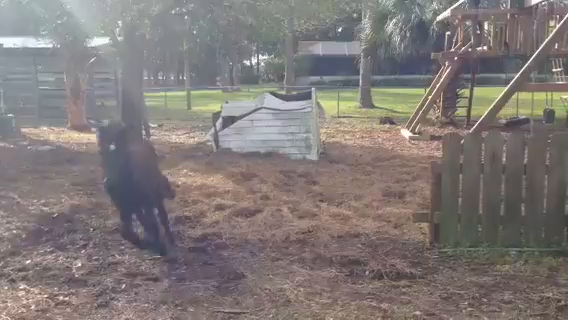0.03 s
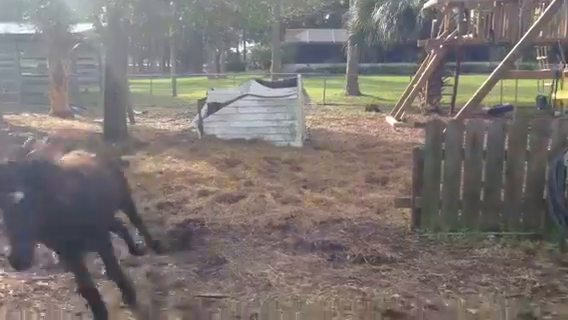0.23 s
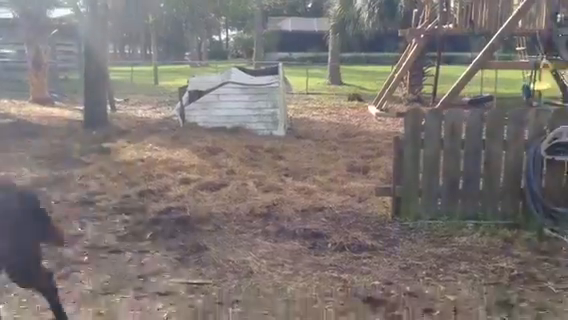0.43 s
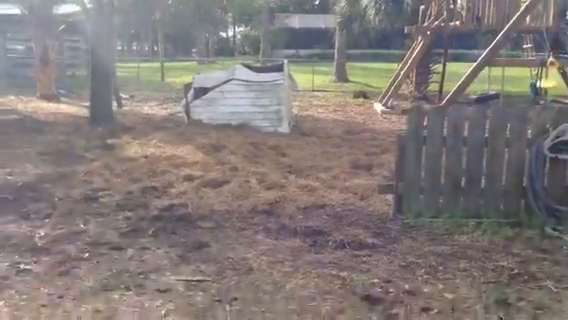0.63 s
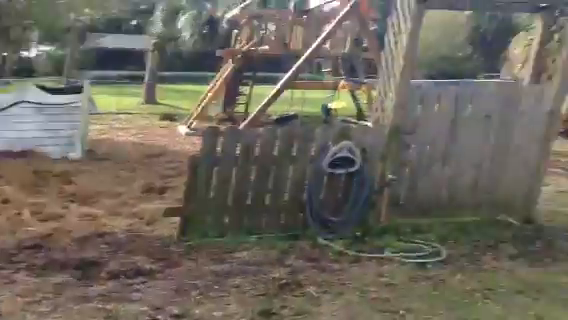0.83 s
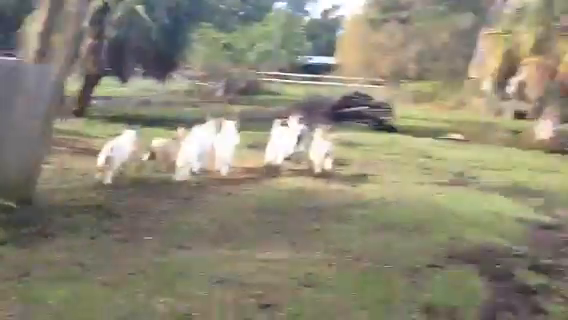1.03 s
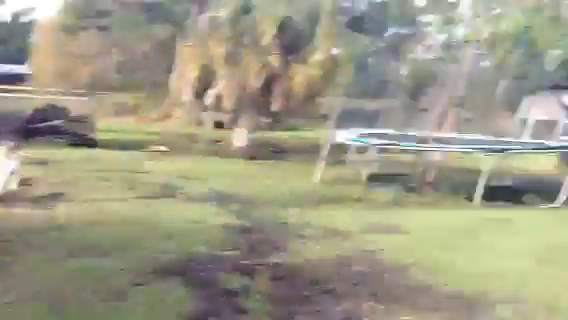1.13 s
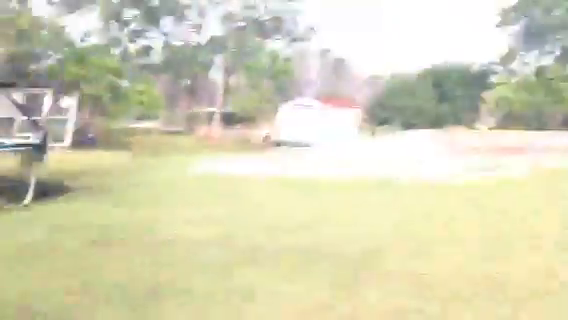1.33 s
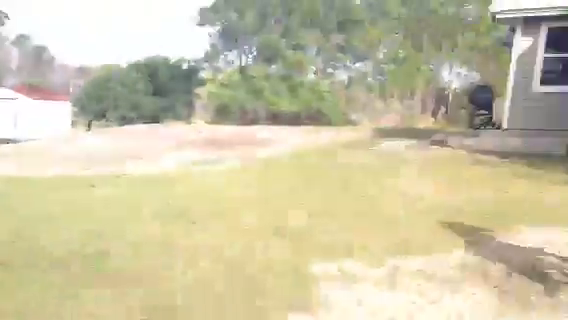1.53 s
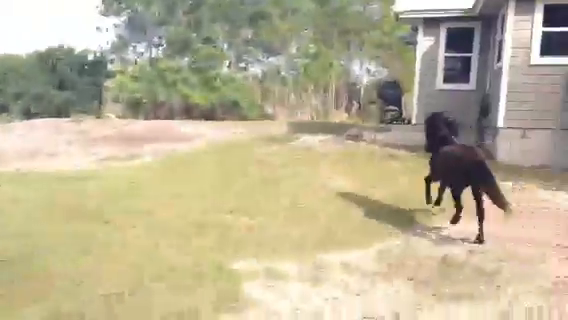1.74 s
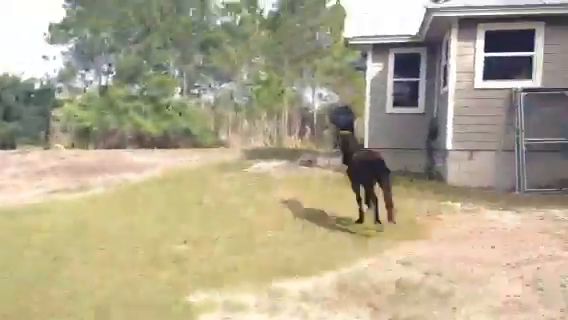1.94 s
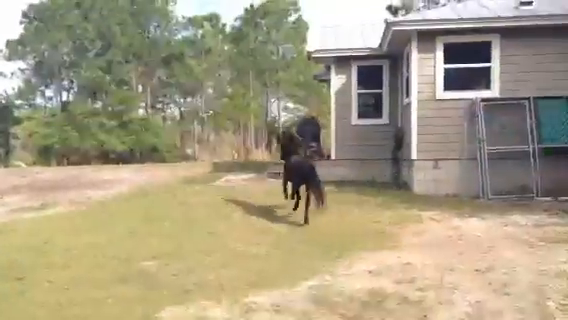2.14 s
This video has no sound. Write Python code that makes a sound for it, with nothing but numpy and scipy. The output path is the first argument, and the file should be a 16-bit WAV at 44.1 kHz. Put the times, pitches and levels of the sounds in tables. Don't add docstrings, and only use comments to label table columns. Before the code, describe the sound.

Quick galloping hoof thuds with gritty crunches on soft ground, over faint yard hum and hiss

```python
import sys
import numpy as np
from scipy import signal
from scipy.fft import rfft, irfft
from scipy.io import wavfile
from scipy.ndimage import uniform_filter1d

SR = 44100
rng = np.random.default_rng(int(sys.argv[2]) if len(sys.argv) > 2 else 0)


def transcribe(signal):
    frames = np.atleast_2d(signal).T
    limited = np.clip(frames, -1, 1)
    pcm = np.round(limited * 32767).astype(np.int16)
    wavfile.write(sys.argv[1], SR, pcm)


def magnitude_from_level(level_db):
    exponent = np.asarray(level_db, float) / 20
    return 10 ** exponent


N = 97020

# (frequency [Hz], density [dB per Hz])
YARD_SPECTRUM = [(15, -5), (25, -21.5), (93, 1.5), (136, -4), (399, -12.5), (482, -23.5), (1530, -24.5),
                 (2920, -29.5), (15500, -36)]
# (time [s], level [dB])
SWING_LEVEL = [(.09, -65), (.5, -60), (.9, -60), (1.05, -53.5), (1.25, -57.5), (1.4, -75), (2.2, -67)]
# (time [s], level [dB])
RUSTLE_LEVEL = [(.09, -57), (.2, -58), (.35, -58), (.55, -58), (.65, -57), (.8, -55), (1.0, -55),
                (1.3, -60), (2.2, -66)]
# (frequency [Hz], density [dB per Hz])
LITTER_SPECTRUM = [(120, 15.5), (270, 6.5), (410, 6.5), (600, 4), (1500, -1), (2450, -12), (2800, -26)]
# (time [s], level [dB])
DIRT_LEVEL = [(.09, -67), (.2, -59), (.26, -58), (.34, -60.5), (.42, -62), (.5, -63.5), (.56, -62.5),
              (.63, -64), (.78, -63.5), (.9, -73), (1.05, -67), (1.2, -74.5), (1.6, -72.5), (2.2, -85)]
# (frequency [Hz], density [dB per Hz])
DIRT_SPECTRUM = [(300, -11), (800, 5.5), (1500, 3), (2600, -3), (5000, -5), (9000, -7.5), (15000, -16)]
# (time [s], level [dB], length [ms], centre [Hz])
SCUFFS = [(.1445, -49.5, 1.7, 3040), (.198, -56.5, 16, 1720), (.196, -61, 4.7, 6500),
          (.547, -63, 4.4, 8500), (.4345, -58, 1.1, 6500), (.235, -65, 5.6, 4000), (.2595, -58, 2.4, 2000),
          (.4835, -51, 3.9, 2770), (.505, -62.5, 10, 3170), (.523, -55.5, 7.2, 1690),
          (.5395, -57.5, 8.2, 2060), (.55, -62, 14, 3280), (.5665, -55.5, 7.3, 1790), (.5945, -51, 2, 4540),
          (.608, -66, 4, 4530), (.680, -50.5, 4.3, 1760), (.7525, -52, 5.3, 2660), (.8135, -56.5, 3, 2200),
          (.8385, -63, 5, 2130), (.93, -70, 3, 1840), (.958, -54, 8.1, 2200), (1.122, -67, 3, 1950),
          (1.3805, -56, 4.2, 710), (1.4793, -53.5, 2.3, 2110), (1.479, -55, 2.5, 8260),
          (1.557, -60, 1.5, 1930), (1.657, -68, 6, 3480), (1.682, -70, 3, 4300), (1.787, -64.5, 11, 1620),
          (1.806, -61.5, 2.5, 3750), (1.865, -67, 4, 1700), (1.893, -61, 4.6, 3600),
          (1.906, -57, 3.9, 1850), (1.913, -69, 2.4, 3500), (1.993, -64.5, 4.2, 2600),
          (2.142, -62.5, 6, 1070)]
# (time [s], level [dB], length [ms], centre [Hz])
CRUNCHES = [(0.1466, -50.5, 3.5, 6500), (0.1862, -50, 0.91, 6328.0), (0.1916, -55, 6.9, 4015.0),
            (0.2615, -55, 3.8, 5560), (0.2737, -60.5, 9, 5711.0), (0.4343, -65, 1.1, 5907.0),
            (0.4848, -54.5, 2.5, 4120), (0.4909, -50, 1.3, 4920), (0.5483, -77, 2.2, 4887.0),
            (0.5945, -58, 2.3, 5000), (0.6805, -52, 6, 5760), (0.7515, -58, 5.9, 4170),
            (0.7758, -57, 1.1, 5759.0), (0.8387, -62, 11, 4575.0), (0.9635, -77, 3, 3468.0),
            (1.3811, -64.5, 6.4, 5400), (1.453, -64, 4, 5448.0), (1.4791, -55.5, 3.5, 4700),
            (1.5425, -56, 2.5, 4280), (1.5592, -59.5, 6.9, 3280), (1.8062, -72, 2.4, 4500),
            (1.8929, -67, 1.5, 4540), (1.9061, -62.5, 4, 6260),
            (.3217, -58, 1.8, 5000),
    (.3314, -54, 2.2, 9000),
    (.9656, -52, 4, 2100),
    (1.0172, -56, 3.3, 2200),
]
RINGING_THINGS = {"stick": (1090, -28.5, 5.9), "stick high": (2140, -35.5, 7.4),
                  "stone": (4850, -32.5, 7.5), "stone low": (3600, -45, 7.6),
                  "hoof crack": (2160, -30.5, 13.3), "hoof wall": (767, -29.5, 37),
                  "hoof edge": (1460, -21.5, 4.2), "grit": (4510, -42, 11), "clod": (2350, -50, 30),
                  "sole": (376, -31.5, 42), "toe": (930, -37.5, 9.1), "heel": (700, -46, 16),
                  "toe on grass": (970, -43, 11), "chip": (4900, -49.5, 10), "shell": (1700, -50.5, 17)}
RINGING_TIMES = [.1913, .1914, .3306, .3310, .9618, .9622, .9632, .9645, 1.054, .9627, .1468, 1.3798,
                 1.4785, 1.5412, 1.8635]
# (time [s], peak [dB], pressure ramp [ms])
SLAPS = [
    (0.1922, -40, 0.25),
    (0.7527, -36.5, 1.2),
    (0.9636, -24, 1.08),
]
# (time [s], level [dB], length [ms], centre [Hz])
KNOCKS = [(0.148, -50, 1.15, 940), (0.1925, -53, 2.3, 1280), (0.4855, -57.5, 5.4, 1460),
          (0.5479, -53, 6.9, 1390), (0.7527, -48, 3.1, 1310), (0.842, -54.5, 7.9, 1490),
          (1.0216, -52, 5.9, 920), (1.3816, -58, 11, 750), (1.454, -55, 7.4, 900), (1.4795, -55.5, 3, 1020),
          (1.559, -51.5, 1.4, 885), (1.8059, -55.5, 3, 830), (1.8937, -64, 1.5, 1195.0),
          (1.8975, -56, 3.6, 890), (1.9057, -68, 3.5, 1300)]
# (time of first crest [s], peak [dB], pitch [Hz], ring [cycles])
HOOF_THUDS = [(0.1468, -38.5, 150.0, 2.5), (0.156, -36, 150.0, 3.6), (0.2066, -39, 143.0, 1.3),
              (0.2608, -35, 217, 3.4), (0.2761, -31.5, 175, 1.5), (0.3066, -48, 150, 1.2),
              (0.3229, -29.5, 200, 1.27), (0.339, -38.5, 217, 2.4), (0.3598, -41.5, 153.0, 3),
              (0.4703, -46, 157, 1), (0.4836, -35.5, 155, 3.6), (0.4993, -41.5, 159, 1.3),
              (0.5178, -45, 150.0, 1.7), (0.536, -46, 180, 1.3), (0.5422, -39, 200, 2.2),
              (0.592, -41, 152.0, 0.9), (0.6812, -29, 155, 2.2), (0.6848, -30, 413, 1.26),
              (0.7056, -63, 126, 2.4), (0.7168, -39, 135, 1.3), (0.7533, -30.5, 180, 1.4),
              (0.7806, -37.5, 156, 0.74), (0.8229, -37, 222, 0.47),
              (0.9576, -33, 170, 1.1), (0.9628, -25, 175, 1.2), (0.9796, -33, 166, 0.98),
               (1.0199, -34, 132, 4.3), (1.0775, -34.5, 150.0, 2), (1.085, -34, 144, 0.17),
               (1.1494, -41.5, 172, 1.5), (1.1606, -40, 143, 5.1), (1.3797, -34, 199, 3.3),
               (1.3943, -37, 168, 3.1), (1.452, -39.5, 233, 1.4), (1.4787, -31, 203, 2.3),
               (1.558, -34, 242, 0.74), (1.8027, -39, 290, 0.9), (1.8056, -28.5, 294, 1.27),
               (1.8508, -46, 240.0, 2.2), (1.888, -40.5, 357, 9.9), (1.9035, -30.5, 140, 0.78),
               (1.9446, -43.5, 233, 1.2), (1.9934, -36, 260, 1.3)]


def noise():
    return rng.standard_normal(N)


def unit(x):
    return x / np.sqrt(np.mean(x ** 2))


def resonance(x, hz, width_hz):
    return signal.lfilter(*signal.iirpeak(hz, hz / width_hz, fs=SR), x)


def double_resonance(x, hz, width_hz):
    return resonance(resonance(x, hz, width_hz), hz, width_hz)


def colour(x, spectrum):
    hz, db = np.array(spectrum).T
    bins_hz = np.maximum(np.arange(N // 2 + 1) * SR / N, 1)
    gain = magnitude_from_level(np.interp(np.log(bins_hz), np.log(hz), db, left=-60))
    return unit(irfft(rfft(x) * gain, N))


def curve(points):
    return np.interp(np.arange(N) / SR, *np.array(points).T)


def walk(rate_hz):
    k = int(SR / rate_hz)
    held = np.repeat(rng.standard_normal(N // k + 1), k)
    return 1.3 * uniform_filter1d(uniform_filter1d(held, k), k)[:N]


def decay(t, t60_s):
    return np.exp(-np.log(1000) * t / t60_s)


def add(out, x, at_s):
    i = int(at_s * SR) - len(x) // 2
    out[i:i + len(x)] += x[:len(out) - i]


def yard():
    air = colour(noise(), YARD_SPECTRUM)
    bass = signal.sosfilt(signal.butter(2, 500, fs=SR, output="sos"), air)
    hiss = air - bass
    air = bass * magnitude_from_level(1.0 * walk(18)) + hiss
    hum_hz = 90 * (1 + .05 * walk(15))
    hum = np.sin(2 * np.pi * np.cumsum(hum_hz) / SR) * magnitude_from_level(4.5 * walk(10.88))
    return magnitude_from_level(-57) * air + magnitude_from_level(-63) * hum


def swing():
    air = noise()
    buffeting = unit(double_resonance(air, 65, 48))
    sway = unit(double_resonance(air, 41.4, 41))
    return (buffeting + magnitude_from_level(-12) * sway) * magnitude_from_level(curve(SWING_LEVEL) + 2.5 * walk(11.7))


def rustle():
    return colour(noise(), LITTER_SPECTRUM) * magnitude_from_level(curve(RUSTLE_LEVEL) + 1.0 * walk(40.26))


def falling_dirt():
    GRAINS_PER_S, GRAIN_SPREAD_DB = 6000, 2.0
    lands = rng.random(N) < GRAINS_PER_S / SR
    weight = magnitude_from_level(GRAIN_SPREAD_DB * np.minimum(rng.exponential(size=N), 4))
    hits = lands * weight * noise()
    return colour(hits, DIRT_SPECTRUM) * magnitude_from_level(curve(DIRT_LEVEL) + 1.3 * walk(25))


def bursts(rows, q, spread_db):
    SHARP_ATTACK, TAIL_LENGTHS, TAIL_DB = .4, 16, -15.5
    t, out = np.arange(-1024, 1024) / SR, np.zeros(N)
    for s, db, ms, hz in rows:
        grains = rng.standard_normal(2048) * magnitude_from_level(spread_db * rng.standard_normal(2048))
        width = ms / 1500
        from_peak = t + .5 * width
        side_width = width * np.where(from_peak < 0, SHARP_ATTACK, 1)
        core = np.exp(-.5 * (from_peak / side_width) ** 2)
        x = double_resonance(grains, hz, 1.5 * hz / q)
        x = x / np.sqrt(np.sum((x * core) ** 2) / np.sum(core ** 2))
        tail = (t > 0) * np.exp(-np.abs(t) / (TAIL_LENGTHS * width))
        add(out, magnitude_from_level(db) * x * (core + magnitude_from_level(TAIL_DB) * tail), s)
    return out


def struck_things():
    t, out = np.arange(-2048, 2048) / SR, np.zeros(N)
    after = np.maximum(t, 0)
    for s, (hz, db, t60_ms) in zip(RINGING_TIMES, RINGING_THINGS.values()):
        onset = 1 - np.exp(-after / 0.00024)
        ring = np.sin(2 * np.pi * hz * after) * decay(after, t60_ms / 1000)
        add(out, magnitude_from_level(db) * onset * ring, s)
    return out


def slaps():
    t, out = np.arange(-2048, 2048) / SR, np.zeros(N)
    held = 1 / (1 + np.exp(np.clip(t / .00007, -50, 50)))
    for s, db, ms in SLAPS:
        ramps = t / (ms / 1000)
        push = np.clip(1 + ramps, 0, 1) ** 1.2 * held
        recoil = 0.73 * (1 - held) * np.exp(-(np.abs(ramps) / 4.4) ** 3)
        add(out, magnitude_from_level(db) * (push - recoil), s)
    return out


def thuds(rows):
    RISE_SHARE, CREST_CYCLES, SAG, OVERTONE_DB = .75, .33, 0.1, -23
    ROLL_DB, ROLL_HZ, ROLL_WIDTH_HZ, ROLL_T60_S = -13, 150, 180, 0.13
    t, hit, push = np.arange(-4096, 4096) / SR, np.zeros(N), np.zeros(N)
    after = np.maximum(t, 0)
    roll = (1 - np.exp(-(after / 0.0071) ** 2)) * decay(after, ROLL_T60_S)
    for s, db, hz, ring in rows:
        cycles = t * hz
        late = np.maximum(cycles - CREST_CYCLES, 0)
        rise = RISE_SHARE * min(ring, 1.2)
        width = 0.34 * np.where(cycles < CREST_CYCLES, rise, ring)
        env = np.exp(-.5 * ((cycles - CREST_CYCLES) / width) ** 2)
        phase = 2 * np.pi * (cycles - SAG * late ** 2 / (1 + late))
        overtone = magnitude_from_level(OVERTONE_DB) * env * np.sin(2 * phase)
        add(hit, magnitude_from_level(db) * env * (np.cos(phase) + overtone), s)
        add(push, magnitude_from_level(db) * roll, s)
    soil = unit(double_resonance(noise(), ROLL_HZ, ROLL_WIDTH_HZ))
    return hit + magnitude_from_level(ROLL_DB) * push * soil


def scene():
    background = yard() + swing()
    ground = rustle() + falling_dirt() + bursts(SCUFFS, 2.32, 4.8)
    strikes = struck_things() + slaps() + thuds(HOOF_THUDS)
    bass_cut = signal.butter(2, 74, "high", fs=SR, output="sos")
    hooves = signal.sosfiltfilt(bass_cut, strikes)
    hooves = hooves + bursts(KNOCKS, 1.9, 0.48) + bursts(CRUNCHES, 1.1, 7.0)
    return (background + ground + hooves)[None]


def low_pass(x):
    return signal.sosfilt(signal.butter(12, 15660, fs=SR, output="sos"), x)


def record(dry):
    START_S, FADE_S, TOP_HZ = .0838, 0.00032, 15540
    x = dry - 0.18 * resonance(dry, 2860, 240)
    x = signal.sosfilt(signal.ellip(12, .2, 70, TOP_HZ, fs=SR, output="sos"), x)
    x = x * np.clip((np.arange(N) / SR - START_S) / FADE_S, 0, 1)
    return low_pass(x)


dry = scene()
out = record(dry)
transcribe(out)
```